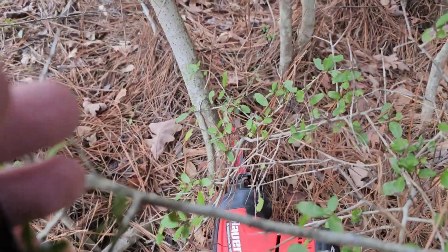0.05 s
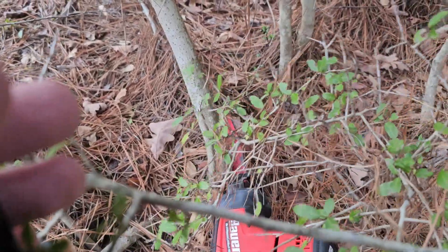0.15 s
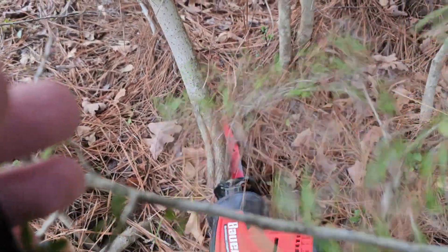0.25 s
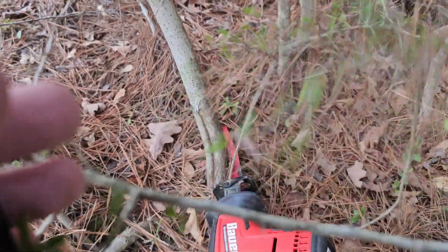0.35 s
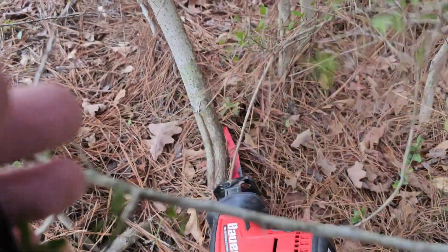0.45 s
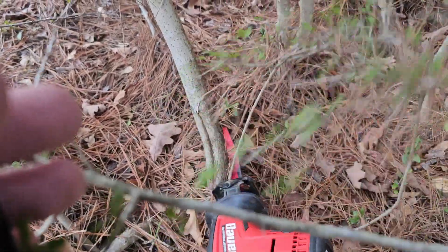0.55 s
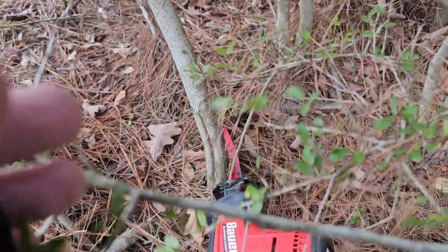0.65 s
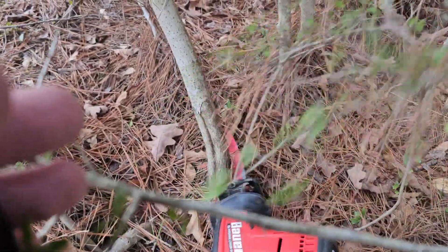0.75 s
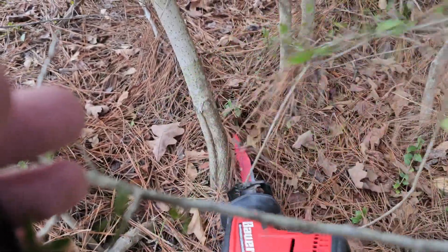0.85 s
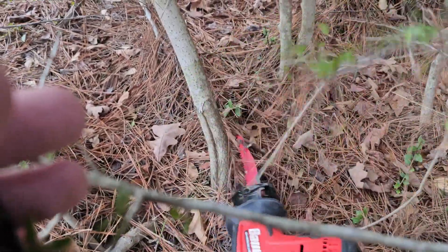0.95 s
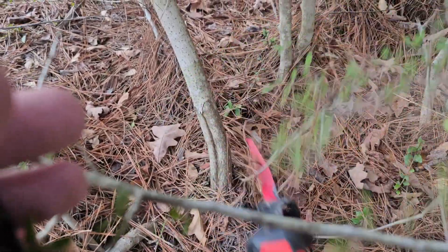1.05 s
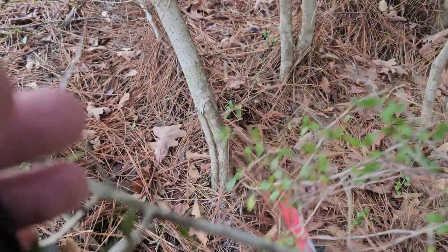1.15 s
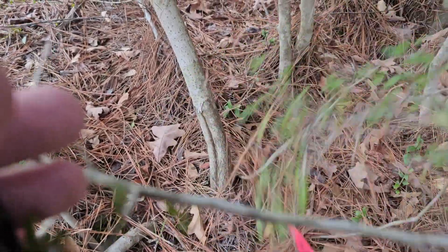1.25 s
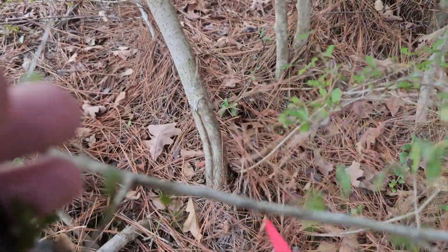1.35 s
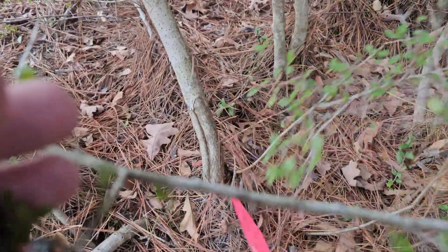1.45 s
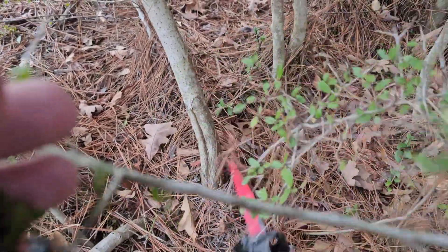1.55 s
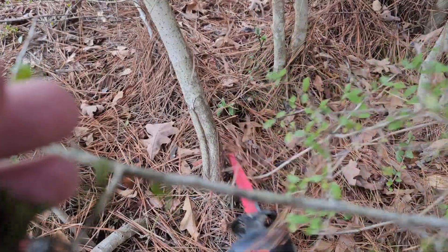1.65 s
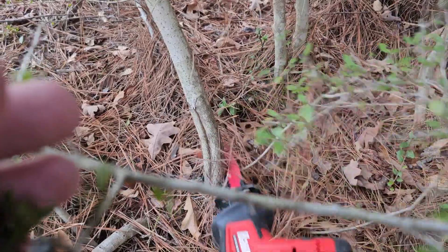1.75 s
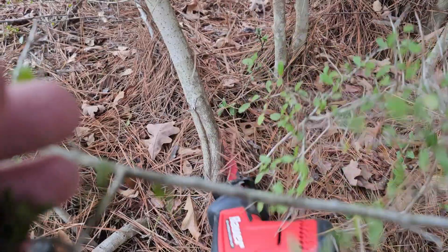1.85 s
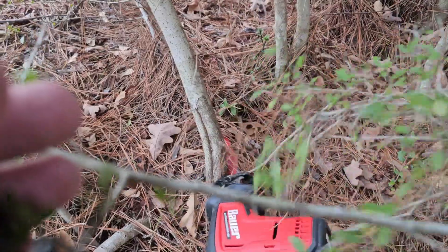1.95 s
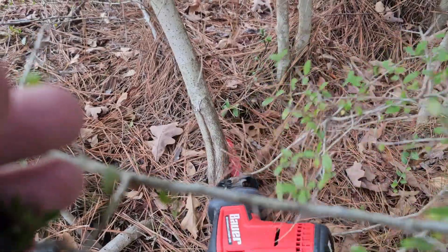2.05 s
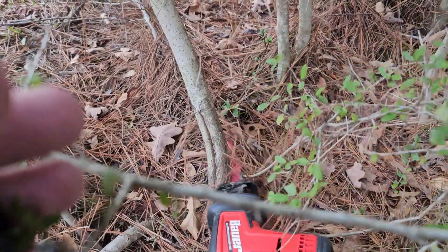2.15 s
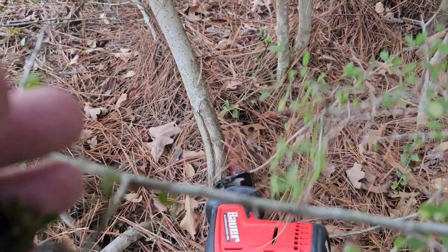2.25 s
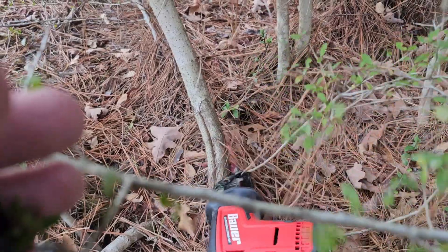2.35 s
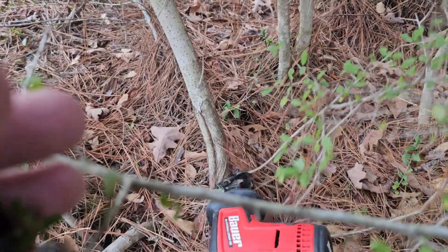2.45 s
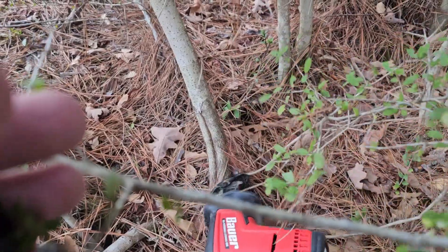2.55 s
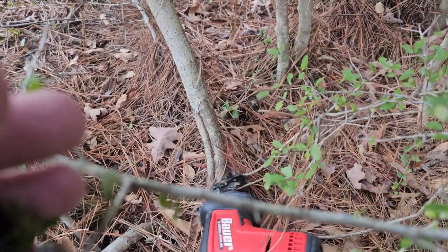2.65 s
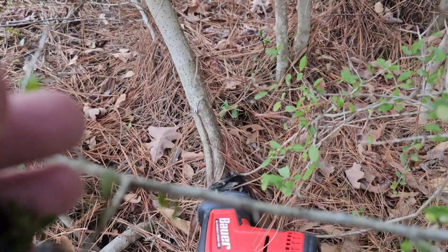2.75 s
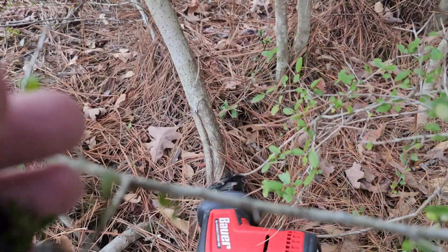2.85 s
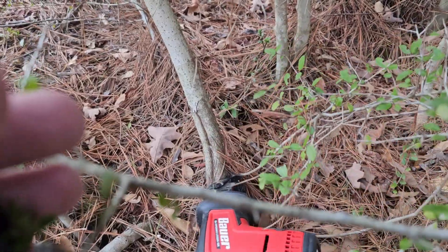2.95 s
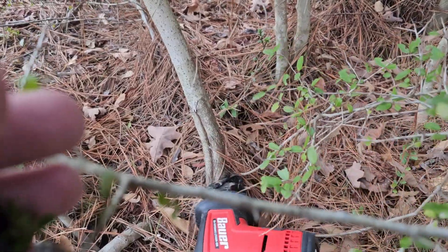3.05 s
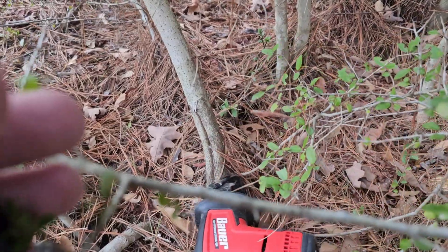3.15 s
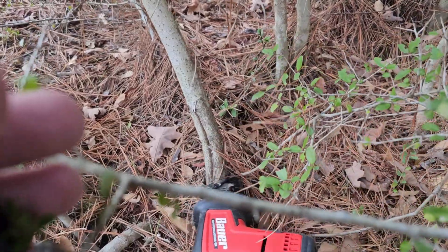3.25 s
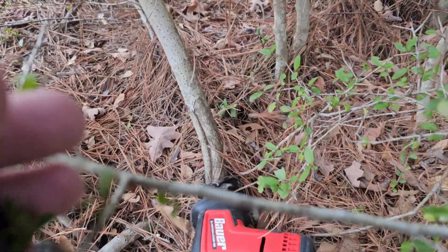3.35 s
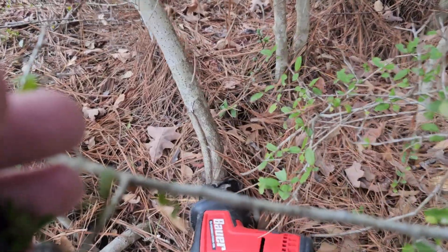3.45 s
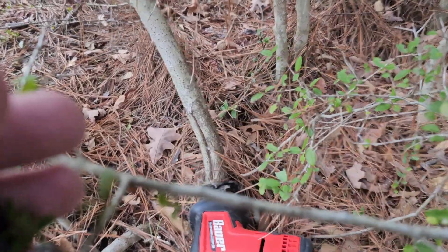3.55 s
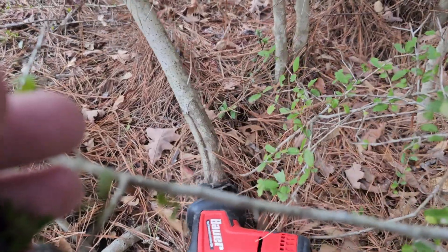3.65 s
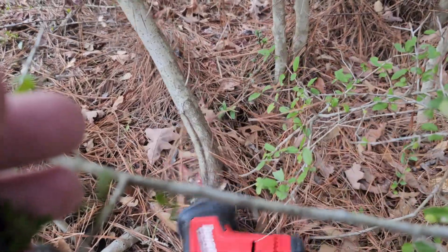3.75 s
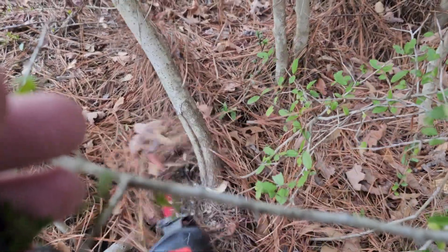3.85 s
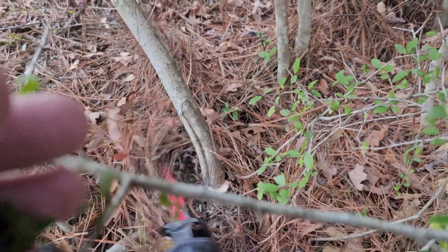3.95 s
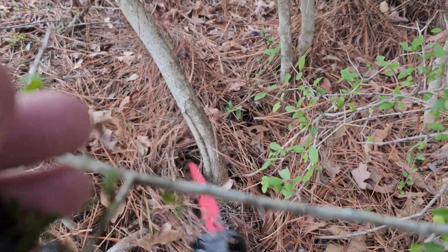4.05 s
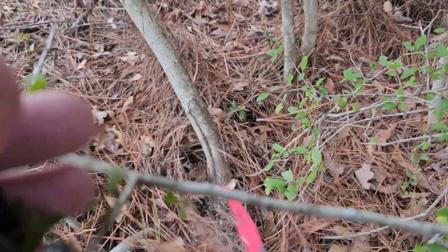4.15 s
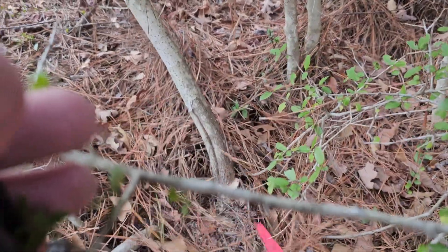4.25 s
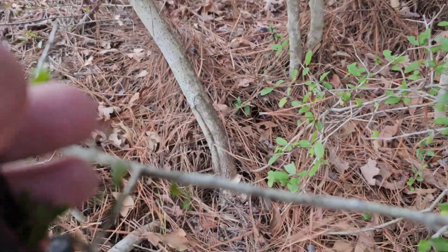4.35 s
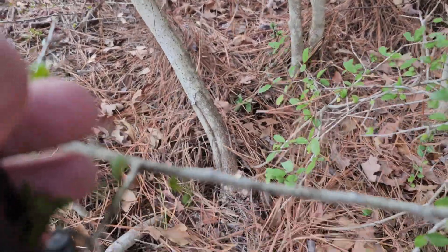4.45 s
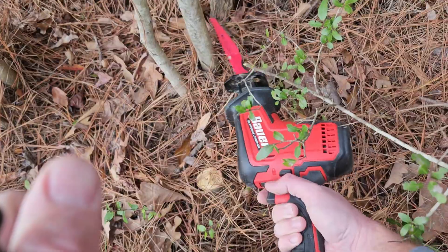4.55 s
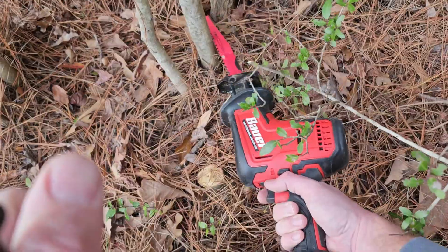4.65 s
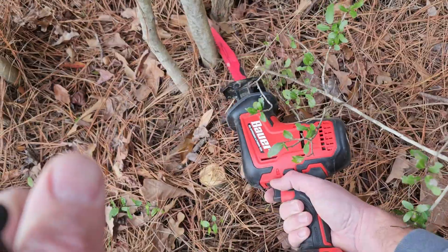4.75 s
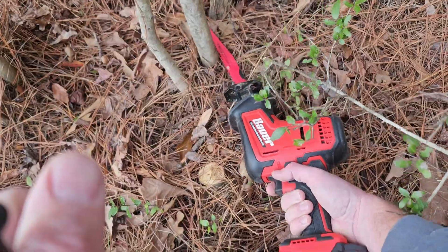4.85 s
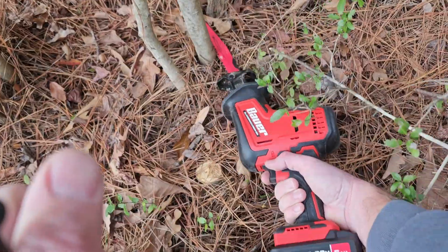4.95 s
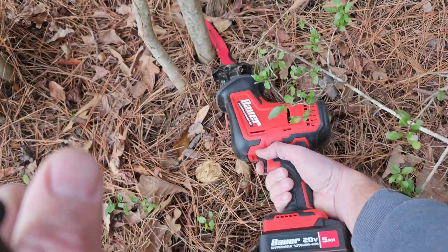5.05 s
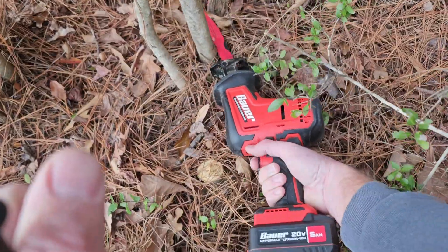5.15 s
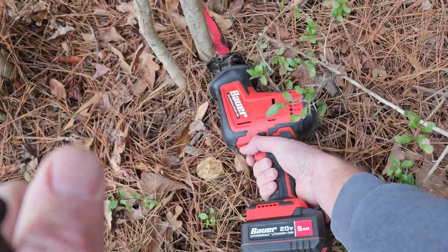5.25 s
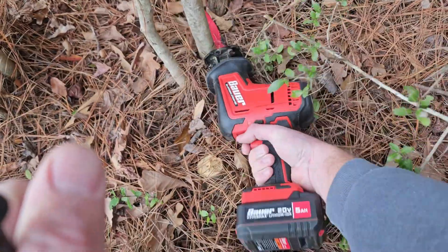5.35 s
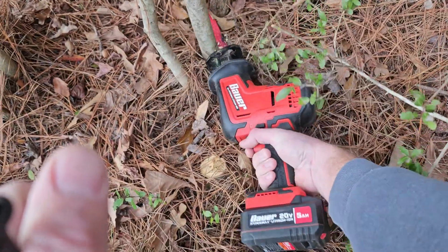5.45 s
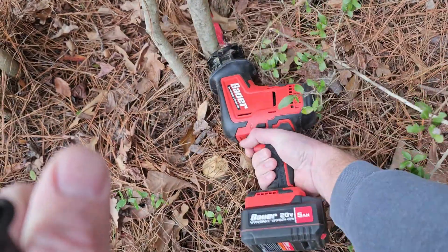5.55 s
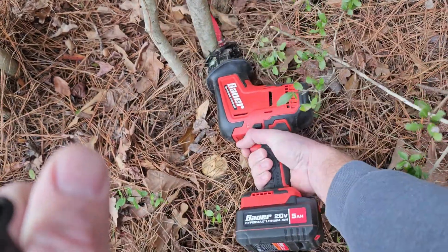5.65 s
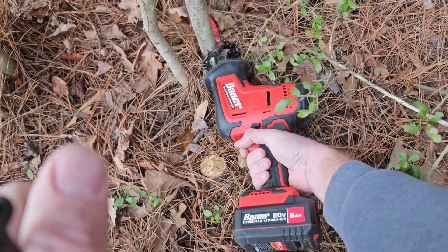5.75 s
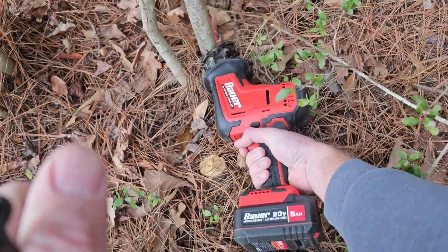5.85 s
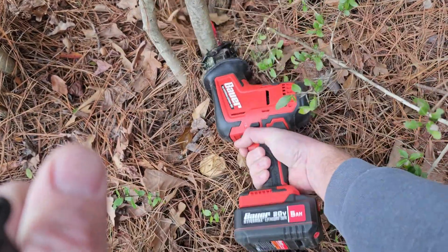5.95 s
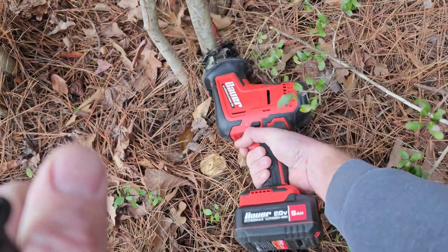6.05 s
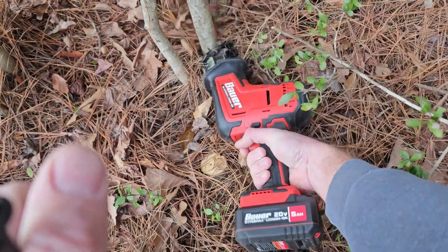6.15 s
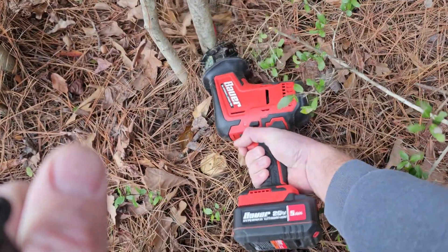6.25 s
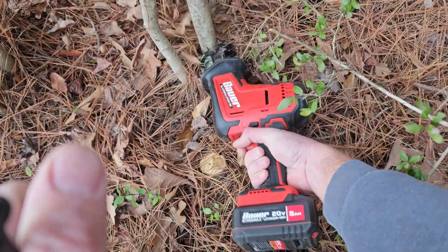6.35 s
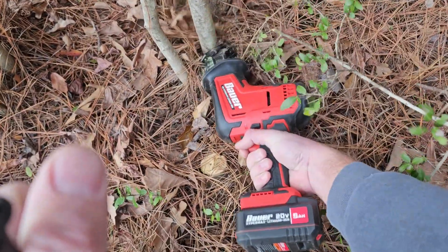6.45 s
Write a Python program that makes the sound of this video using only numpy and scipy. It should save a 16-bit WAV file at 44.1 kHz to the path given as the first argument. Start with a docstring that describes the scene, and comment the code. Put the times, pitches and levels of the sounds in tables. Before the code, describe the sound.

In quiet woodland with a very faint distant engine hum, a twig ticks and a cordless reciprocating saw gives one short clattering blip. Leaves brush and small twigs snap. The saw then starts with a rising gear whine and chatters through a green stem for about two seconds, slows abruptly, and leaves rustle. Sharp twig cracks lead into a second, similar cut that runs to the end. Close stereo microphone, dry open air.

```python
"""Still air and a far engine's low hum, a twig snap, then one short blip of a cordless reciprocating saw close by.
The saw then cuts two saplings; twigs snap and leaves rustle before and between the cuts.
Each stroke knocks the slack drive (filtered impulses and rattle), shakes the tool (harmonics of the stroke rate),
drags teeth through green wood (pulsed noise) and turns whining gears (a tone tied to the motor).
Air, leaves and handling are filtered noise; the engine is a wavering sine."""
import sys
import numpy as np
from scipy import signal
from scipy.fft import rfft, irfft
from scipy.io import wavfile
from scipy.ndimage import uniform_filter1d

SR = 44100
rng = np.random.default_rng(int(sys.argv[2]) if len(sys.argv) > 2 else 0)


def put_to_file(sound):
    """Save the sound as 16-bit audio at rate SR, in the file named by the first command-line argument."""
    columns = np.atleast_2d(sound).T  # one column per channel
    safe = np.clip(columns, -1, 1)
    whole_steps = np.round(safe * 32767)
    wavfile.write(sys.argv[1], SR, whole_steps.astype(np.int16))


N = 286650
T = np.arange(N) / SR  # s
HZ = np.fft.rfftfreq(N, 1 / SR)

# still air: freq_hz, rel_db_per_hz
AIR_SPECTRUM = [(15, -41), (25, -10.5), (84, -3), (190, -18), (416, -15), (560, -18.5), (677, -24),
                (1400, -27), (2690, -35.5), (4370, -31), (6740, -37), (7510, -33), (10700, -42),
                (14800, -36), (16000, -43)]
# far engine: time_s, level_db
ENGINE_LEVEL = [(0, -47), (1.3, -48.5), (1.6, -53.5), (5, -54.5)]
# swells of a far drone: middle_s, length_s, rel_db
DRONE_SWELLS = [(1, 0.29, -57.5), (1.72, 0.43, -50.5)]
DRONE_SPECTRUM = [(280, -10), (420, 2), (560, -11)]  # freq_hz, rel_db_per_hz
# twig snaps: time_s, rel_db
TWIG_SNAPS = [(0.1467, -38.5), (0.842, -31), (1.1766, -38), (1.3585, -24), (1.4135, -29), (1.6375, -37),
              (1.7647, -25), (1.8945, -21), (2.0213, -26.5), (2.072, -28), (4.6992, -31), (4.8443, -18),
              (4.8835, -10.5), (4.9383, -26), (5.031, -23), (5.1355, -20)]
SNAP_SPECTRUM = [(700, -28), (1500, -11.5), (5000, -2.5), (9000, -8.5), (15000, -8)]  # freq_hz, rel_db
# brushes through leaves: start_s, length_s, crisp_rel_db, papery_rel_db
LEAF_BRUSHES = [(0.375, 0.043, -46.5, -58), (.45, 0.54, -62, -65), (0.797, 0.58, -48, -59.5),
                (0.924, 0.32, -53.5, -65), (0.955, 0.11, -46.5, -51), (1.398, 0.76, -54.5, -60),
                (1.623, 0.37, -52, -55.5), (1.715, 0.11, -46, -51.5), (1.857, 0.11, -40, -49.5),
                (4, 0.27, -43, -52), (4.17, 0.02, -35.5, -57), (4.262, 0.5, -51.5, -59),
                (4.83, .385, -36, -43.5), (5.207, 0.021, -25, -34)]
# crisp leaf sound: freq_hz, rel_db_per_hz
CRISP_SPECTRUM = [(1180, -24), (2000, -13), (2640, -8.5), (4610, 3.5), (6760, -2), (7510, 0), (8780, -2.5),
                  (14900, -2.5), (16000, -3)]
# papery leaf sound: freq_hz, rel_db_per_hz
PAPERY_SPECTRUM = [(240, -14.5), (400, -3.5), (533, -7), (629, -5), (947, -5.5), (1350, -0.5), (2620, -5.5),
                   (3200, 0), (4160, -20.5), (7040, -120)]
# stereo tilt of the leaves: freq_hz, left_minus_right_db
LEAF_TILT = [(300, 6.5), (2000, 1.5), (6000, 2.5), (14000, .5)]
# motor twitches before it starts: time_s, rel_db
MOTOR_TWITCHES = [(0.2334, -24), (2.118, -23.5)]
# resonances of the motor can: freq_hz, width_hz, rel_db
CAN_RINGS = [(1240, 250, -13), (1920, 130, -14), (3600, 140, -6), (5000, 170, -33)]
# single knocks of tool and blade: time_s, bright_clack_rel_db, dull_thud_rel_db
SINGLE_KNOCKS = [(.278, -20, -37), (0.29, -12.5, -23), (.319, -8.5, -9), (0.341, -7, -10), (0.368, -13, -8),
                 (0.397, -34, -40), (0.779, -21.5, -46), (1.795, -33, -26), (1.817, -25.5, -33),
                 (2.106, -33.5, -40), (2.137, -25, -38), (2.151, -12, -34.5), (2.19, -14, -33),
                 (4.006, -11, -15), (4.035, -15, -26), (4.472, -53, -29), (4.697, -30.5, -25),
                 (4.762, -40, -30), (4.8, -35, -30), (4.816, -29.5, -34), (4.865, -27, -38)]
CLACK_SPECTRUM = [(300, -23), (600, -2), (1000, -6.0), (1400, -3.0), (1950, -4.0),
                  (2500, -17), (5000, -16), (12000, -43)]  # freq_hz, rel_db
THUD_SPECTRUM = [(110, -29), (220, -6.5), (330, -8.5), (450, 4), (620, -3.5), (850, -7)]  # freq_hz, rel_db
# low buffeting of shaken stems and handling: middle_s, length_s, level_db
BUFFET_SWELLS = [(1.85, 0.24, -51), (2.3, 0.17, -45), (2.7, 0.63, -36.5), (3.54, 0.24, -35),
                 (3.73, 0.11, -26), (4.7, 0.047, -46), (4.82, .08, -42), (5.22, 0.15, -45),
                 (5.38, 0.23, -26.5), (6.35, .5, -35.5)]
BUFFET_SPECTRUM = [(25, -14), (45, 0.0), (90, -3.0), (130, -12), (200, -8), (300, -6)]  # freq_hz, rel_db_per_hz
# trigger pull, blip: pressed_s, released_s, plunger_turn_s, wait_before_full_speed_s
BLIP_PULL = (.265, .368, .343, .5)
# trigger pull, first cut: pressed_s, released_s, plunger_turn_s, wait_before_full_speed_s
FIRST_PULL = (2.15, 4.003, 2.3056, .5)
# trigger pull, second cut: pressed_s, released_s, plunger_turn_s, wait_before_full_speed_s
SECOND_PULL = (5.212, 6.6, 5.3694, .475)
# knocks of the drive in one stroke: place_turns, thud_rel_db, clack_rel_db, scatter_turns
STROKE_KNOCKS = [(-.11, -4, -12, .007), (-.005, -5, 0, .003), (.04, -3, -14, .007), (.13, -7, -7.5, .012),
                 (.41, -.5, -10, .007), (.53, -5, -6.5, .016), (.8, -13, -8, .01)]
# resonances of the housing: freq_hz, width_hz, rel_db
HOUSING_RINGS = [(1361, 7.7, 4), (1920, 150, -11)]
# tool and sapling together, first cut: freq_hz, rel_db_per_hz
FIRST_BODY_SPECTRUM = [(120, -37), (200, -5.5), (221, -16.5), (254, -1), (376, -12), (438, -1), (478, -4.5),
                       (551, 1.5), (870, -1.5), (1000, -7.5), (1300, 2.5), (1710, -1.5), (1880, 3.5),
                       (2400, -12.5), (2700, -11.5), (3510, -80), (5940, -120)]
# tool and sapling together, second cut: freq_hz, rel_db_per_hz
SECOND_BODY_SPECTRUM = [(71, -18), (120, -10), (150, -6.5), (189, -3), (227, 0.5), (311, -0.5), (378, -6.5),
                        (653, 3.5), (1100, -4), (1350, -2.5), (1560, 1.5), (1710, -2.5), (1920, 2),
                        (2430, -10), (2700, -15), (3510, -26), (5940, -120)]
# blade in the wood, first cut: freq_hz, rel_db_per_hz
FIRST_BLADE_SPECTRUM = [(1290, -11.5), (2200, -2), (2470, -17), (2710, -3.5), (3740, -8), (4570, -2),
                        (5170, -4), (5910, -9.5), (6920, -11), (9720, -12), (10700, -16), (12800, -9.5),
                        (15000, -15.5), (16000, -11)]
# blade in the wood, second cut: freq_hz, rel_db_per_hz
SECOND_BLADE_SPECTRUM = [(1290, -31), (2200, -3), (2510, -9.5), (3120, -2), (3900, -10), (4490, -4.5),
                         (6310, -13), (7030, -10.5), (8300, -13), (11500, -13.5), (13900, -13),
                         (14800, -14), (15500, -11), (16000, -14)]
# shaking of the tool, first cut: multiple_of_stroke_rate, rel_db
FIRST_SHAKE = [(1, 0.5), (2, -10), (3, -3.5), (4, 1), (5, -3.5), (6, -12), (7, -1), (8, -59), (9, 1),
               (10, -24), (11, 4), (12, 2), (13, -11), (14, 3)]
# shaking of the tool, second cut: multiple_of_stroke_rate, rel_db
SECOND_SHAKE = [(1, 0.5), (2, -7), (3, -7.5), (4, 0.5), (5, -17), (6, -7), (7, -5), (8, -39), (9, -4),
                (10, 0.5), (11, -9), (12, -3), (13, -5), (14, -3)]
# blade binding in the cut: middle_s, length_s, extra_bite_0_to_1, share_lost_every_other_stroke_0_to_1
BLADE_BINDS = [(2.4, 0.058, 0.46, 0), (2.52, .06, .3, 0.16), (2.713, 0.056, 0.54, 0),
               (3.38, 0.21, 0.7, 0.3), (3.71, 0.2, 1, .45)]
# likeness of the two microphone ports: freq_hz, likeness_0_to_1
PORT_LIKENESS = [(130, .95), (290, .96), (640, .96), (1400, .83), (3100, .45), (6000, .12)]
# stereo tilt of the saw, first cut: freq_hz, left_minus_right_db
FIRST_TILT = [(60, 1.5), (110, 3.3), (200, 0.43), (380, 1.3), (700, 1.9), (1290, 4), (2380, 3.7),
              (4400, 3.4), (8120, 0.48), (15000, 2.2)]
# stereo tilt of the saw, second cut: freq_hz, left_minus_right_db
SECOND_TILT = [(60, 1.5), (110, 4), (200, -0.5), (380, 1.5), (700, 0), (1290, 3.5), (2380, 1.5),
               (4400, 2.5), (8120, -0.5), (15000, -1)]

AIR_DB = -55.5
ENGINE_FLUTTER = .2  # unsteadiness of the engine level, rms share
RUSTLE_ATTACK_S, RUSTLE_RELEASE_S = 0.033, 0.037
# soft start, step to full stroke rate, brake on release
SOFT_HZ, FULL_HZ, SPIN_UP_S, GOVERNOR_HZ, STEP_S, BRAKE_S = 45.15, 49.75, .074, 1.48, .1, .062
# first stem parts: the freed motor surges until the governor catches it
THROUGH_S, SURGE_HZ, FREE_S = 3.785, 2.2, .048
HUNT_TURNS = .002  # the governor hunts: strokes come slightly early or late
TAKE_UP_S = 0.046  # the drive knocks fully only once its slack is taken up
COAST_S = 0.047  # decay of the sound under the brake
# exponents: loudness against stroke rate
CLATTER_POWER, RASP_POWER, SHAKE_POWER = 0.39, 0.99, 3
LOOSE = .7  # rattle of loose parts, relative to the knock
WHINE_ROUGH = .3  # flutter of the gear whine, rms share
EDGE_HZ = 15750


def amp(db):
    """Decibels to gain."""
    return 10 ** (np.asarray(db) / 20)


def evened(x):
    """Scales to an rms of 1."""
    return x / np.sqrt(np.mean(x ** 2) + 1e-20)


def unit(x, where=slice(None)):
    """Scales a pair so that its centre has an rms of 1."""
    return x / np.sqrt(np.mean(x.mean(0)[where] ** 2) + 1e-20)


def read(points, hz):
    """Reads a spectrum table on a log-frequency axis."""
    freq_hz, value = np.transpose(points)
    return np.interp(np.log(hz + 1), np.log(freq_hz + 1), value)


def noise():
    """Two white noises."""
    return rng.standard_normal((2, N))


def wander(hz):
    """Slow random signal of rms 1, up to about hz."""
    return evened(irfft(rfft(rng.standard_normal(N)) / (1 + (HZ / hz) ** 4), N))


def clicks(times_s, sizes):
    """Train of single impulses."""
    index = np.round(np.asarray(times_s) * SR).astype(int)
    return np.bincount(np.clip(index, 0, N - 1), sizes, N)


def fading(x, seconds):
    """Every impulse dies away with this time constant."""
    return signal.lfilter([1], [1, -np.exp(-1 / (seconds * SR))], x)


def bursts(rows, seconds):
    """Short puffs of contact noise, one a row."""
    time_s, rel_db = np.transpose(rows)
    return noise() * fading(clicks(time_s, amp(rel_db)), seconds)


def grains(per_s, spread_db):
    """Sparse crackle of widely varied size."""
    struck = rng.random((2, N)) < per_s / SR
    size = amp(spread_db * rng.exponential(1, (2, N)).clip(0, 4))
    return evened(noise() * struck * size)


def colour(x, points):
    """Causal minimum-phase filter with the given spectrum, falling steeply beyond its ends."""
    hz = abs(np.fft.fftfreq(4096, 1 / SR)) + 1
    octaves_out = np.maximum(np.log2(points[0][0] / hz), np.log2(hz / points[-1][0])).clip(0)
    log_gain = np.log(amp(np.maximum(read(points, hz) - 30 * octaves_out, -90)))
    taps = np.fft.ifft(np.exp(np.conj(signal.hilbert(log_gain)))).real
    return signal.oaconvolve(x, taps[None], axes=1)[:, :N]


def ring(x, hz, width_hz):
    """Resonance with a peak gain of 1."""
    return signal.lfilter(*signal.iirpeak(hz, hz / width_hz, SR), x)


def ports(x, side=None, lag_ms=0.087):
    """Two signals become the port pair: shared bass, separate treble, the right a little late."""
    left, other = rfft(x)
    same = read(PORT_LIKENESS, HZ).clip(0, 1)
    right = same * left + np.sqrt(1 - same ** 2) * other
    right = right * np.exp(-2j * np.pi * HZ * lag_ms / 1000)
    tilt = amp(read(side, HZ) / 2) if side else 1
    return irfft(np.array([left * tilt, right / tilt]), N)


def swell(middle_s, length_s):
    """Rounded hump of height 1; length_s is its width at half height."""
    return np.exp2(-np.minimum(abs(2 * (T - middle_s) / length_s), 4) ** 3)


def swells(rows):
    """Gain of several humps together."""
    return sum(amp(db) * swell(middle_s, length_s) for middle_s, length_s, db in rows)


def outdoors(hum_hz=73, drone_db=-3):
    """Still air as noise, a far engine as a wavering sine, and a faint noise-band drone that comes and goes."""
    air = amp(AIR_DB) * unit(ports(colour(noise(), AIR_SPECTRUM)))
    level = amp(np.interp(T, *np.transpose(ENGINE_LEVEL))) * (1 + ENGINE_FLUTTER * wander(16))
    phase = 2 * np.pi * (hum_hz * T + 0.068 * wander(11)) - np.array([[0], [.3]])
    hum = np.sqrt(2) * level * np.sin(phase) * amp([[1], [-1]])
    drone = unit(ports(colour(noise(), DRONE_SPECTRUM)))
    return air + hum + amp(drone_db) * swells(DRONE_SWELLS) * drone


def brush(start_s, length_s):
    """Envelope of one rustle: quick attack, hold, slower release."""
    t = T - start_s
    release = np.exp(-(t - length_s).clip(0, 1) / RUSTLE_RELEASE_S)
    return (t / RUSTLE_ATTACK_S).clip(0, 1) * release


def undergrowth(crisp_db=-0.5, papery_db=-1, snap_db=3, clump_db=1.1, tick_db=-3):
    """Snapping twigs are noise bursts; leaves and pine needles crackle in clumps, with sparse sharper ticks."""
    snaps = colour(bursts(TWIG_SNAPS, seconds=.0021), SNAP_SPECTRUM)
    clumps = evened(amp(clump_db * wander(47)))
    needles = noise() + grains(per_s=2500, spread_db=4)
    ticks = evened(noise() * fading(grains(per_s=320, spread_db=2.5)[0], seconds=.0006))
    crisp = unit(ports(colour(needles * clumps + amp(tick_db) * ticks, CRISP_SPECTRUM), LEAF_TILT))
    dry_leaves = noise() + grains(per_s=1500, spread_db=3.5)
    papery = unit(ports(colour(dry_leaves * clumps, PAPERY_SPECTRUM), LEAF_TILT))
    power = sum((amp([[high], [low]]) * brush(start_s, length_s)) ** 2
                for start_s, length_s, high, low in LEAF_BRUSHES)
    crisp_level, papery_level = np.sqrt(power)
    leaves = amp(crisp_db) * crisp_level * crisp + amp(papery_db) * papery_level * papery
    return leaves + amp(snap_db) * snaps


def handling(clack_db=7, thud_db=7, twitch_db=23, buffet_db=0):
    """Motor twitches ring the can; knocks of the tool are filtered bursts; buffeting is swelling low noise."""
    jerk = bursts(MOTOR_TWITCHES, seconds=0.0018)
    twitches = sum(amp(db) * ring(jerk, hz, width_hz) for hz, width_hz, db in CAN_RINGS)
    knocks = np.array(SINGLE_KNOCKS)
    clacks = colour(bursts(knocks[:, [0, 1]], seconds=0.0053), CLACK_SPECTRUM)
    thuds = colour(bursts(knocks[:, [0, 2]], seconds=0.002), THUD_SPECTRUM)
    contact = ports(amp(clack_db) * clacks + amp(thud_db) * thuds, FIRST_TILT)
    buffet = unit(ports(colour(noise(), BUFFET_SPECTRUM)))
    return contact + amp(twitch_db) * twitches + amp(buffet_db) * swells(BUFFET_SWELLS) * buffet


def stroke_rate(pressed_s, released_s, wait_s, freed):
    """Strokes a second: soft start with slight overshoot, step to full speed, surge when freed, brake."""
    t = (T - pressed_s).clip(0)
    soft = SOFT_HZ * (1 - np.exp(-t / SPIN_UP_S) * np.cos(2 * np.pi * GOVERNOR_HZ * t))
    step = (FULL_HZ - SOFT_HZ) * ((t - wait_s) / STEP_S).clip(0, 1)
    surge = SURGE_HZ * freed * np.exp(1 - freed)
    brake = (1 - (T - released_s) / BRAKE_S).clip(0, 1)
    return (soft + step + surge) * brake


def dodging(turns):
    """Share of the bite left in each stroke: a springy stem dodges every other one."""
    lost = sum(share * swell(middle_s, length_s) for middle_s, length_s, _, share in BLADE_BINDS)
    return 1 - lost.clip(0, 1) * (np.floor(turns + 1.25) % 2)


def clatter(turns, running, body, side, bed, vary_db=1.3, split_hz=1050, rattle_s=.0018):
    """Slack drive knocks at set places in each stroke; loose parts rattle after it, over a bed of gear noise."""
    place, thud_db, clack_db, scatter = np.transpose(STROKE_KNOCKS)
    strokes = np.arange(np.floor(turns[0]), turns[-1] + 1)[:, None]
    at = strokes + place + scatter * rng.standard_normal((len(strokes), len(place)))
    heard = (at > turns[0]) & (at < turns[-1])
    times_s = np.interp(at[heard], turns[running], T[running])
    drive = 0
    for knock_db, band in ((thud_db, "low"), (clack_db, "high")):
        sizes = amp(knock_db + vary_db * rng.standard_normal(at.shape))[heard]
        blows = clicks(times_s, sizes)
        blows = blows / np.sqrt(np.mean(blows[running] ** 2))
        shake = fading(blows ** 2, rattle_s)
        rattle = noise() * np.sqrt(LOOSE ** 2 * shake / shake[running].mean() + bed ** 2)
        # the far port also hears a bounce off the ground, 1.1 ms late
        blows = np.array([blows, np.roll(blows, round(.0011 * SR))])
        split = signal.butter(3, split_hz, band, fs=SR, output="sos")
        drive = drive + signal.sosfilt(split, blows + rattle)
    drive = drive + sum(amp(db) * ring(drive, hz, width_hz) for hz, width_hz, db in HOUSING_RINGS)
    return unit(ports(colour(drive, body), side), running)


def whine(turns, speed, ring_db, steady_db, strain_db, mesh=107., ring_hz=3720, width_hz=380):
    """Gear whine climbs with the motor and flares as it sweeps up through a ring of the motor can."""
    driving = uniform_filter1d(1. * (np.gradient(speed) > 0), size=300)
    resonance = 1 / (1 + ((mesh * speed - ring_hz) / width_hz) ** 2) ** 2
    flare = amp(steady_db) * speed / FULL_HZ + driving * amp(ring_db) * resonance
    loaded = np.clip((speed - 37) / 4, 0, 1)
    # the load varies within a stroke
    wobble = loaded * (.15 * np.sin(2 * np.pi * turns) + .12 * wander(110))
    angle = mesh * turns + wobble + .05 * wander(300)
    tone = np.cos(2 * np.pi * angle + np.array([[0], [-1.2]]))
    gears = np.sqrt(2) * flare * (1 + WHINE_ROUGH * wander(250)) * tone
    # the can sings under starting torque
    torque = driving * (1 - (speed / SOFT_HZ) ** 2).clip(0, 1) ** 2
    strain = amp(strain_db) * evened(ring(noise(), ring_hz, width_hz)) * torque
    return (gears + strain) * amp([[2], [-1]])


def rasp(turns, running, blade, side, grip, pull_at=0.2, pull_width=.14, bite_gain=3.04):
    """Teeth tear through the wood on the pull stroke; the main knock makes the blade chink."""
    from_pull = (turns - pull_at + .022 * wander(40) + .5) % 1 - .5
    pull = dodging(turns) * np.exp(.35 * wander(250)) / (1 + (from_pull / pull_width) ** 2) ** 2
    force = 1 + bite_gain * grip.clip(0, 1) * pull
    force /= np.sqrt(uniform_filter1d(force ** 2, size=4000))
    teeth = noise() + 0.33 * grains(per_s=3700, spread_db=5.5)
    chink = 2.6 * ring(noise() * np.exp(-(turns % 1) / .045) * running, 3500, 4000)
    return unit(ports(colour(teeth * force + chink, blade), side), running)


def shaking(turns, orders, upper_db, waver=0.25, port_lag=0.18):
    """Swinging plunger shakes the tool at multiples of the stroke rate; the right port gets the lowest late."""
    lowest = amp(orders[0][1])
    hum = lowest * np.cos(2 * np.pi * (turns + .19) - port_lag * np.array([[0], [1]]))  # port_lag in radians
    upper = 0
    for multiple, db in orders[1:]:
        tone = np.cos(2 * np.pi * (round(multiple) * turns + rng.random()))
        upper = upper + amp(db + upper_db) * (1 + waver * wander(14)) * tone
    return np.sqrt(2) * (hum + upper) / lowest * amp([[.9], [-.9]])


def saw(pull, body, blade, side, orders, clatter_db, rasp_db, shake_db, upper_db, ring_db, whine_db,
        strain_db, bed, bite, through_s=np.inf):
    """One trigger pull: everything follows the stroke of the plunger and grows with its speed."""
    pressed_s, released_s, turn_s, wait_s = pull
    freed = (T - through_s).clip(0) / FREE_S
    speed = stroke_rate(pressed_s, released_s, wait_s, freed)
    running, pace = speed > 0, speed / FULL_HZ
    turns = np.cumsum(speed) / SR
    turns += HUNT_TURNS * wander(7) - np.interp(turn_s, T, turns)
    binding = sum(extra * swell(middle_s, length_s) for middle_s, length_s, extra, _ in BLADE_BINDS)
    grip = (bite + binding) * np.exp(-freed)
    # a stroke that bites knocks harder
    load = uniform_filter1d(.55 + .45 * dodging(turns), size=150)
    load /= uniform_filter1d(load, size=3600)
    engaged = ((T - pressed_s) / TAKE_UP_S).clip(0, 1) ** 2
    drive = amp(clatter_db) * engaged * load * clatter(turns, running, body, side, bed)
    drive += whine(turns, speed, ring_db, whine_db, strain_db)
    cutting = amp(rasp_db) * rasp(turns, running, blade, side, grip)
    shake = amp(shake_db) * shaking(turns, orders, upper_db)
    coasting = np.exp(-(T - released_s).clip(0) / COAST_S)
    return coasting * (pace ** CLATTER_POWER * drive + pace ** RASP_POWER * cutting + pace ** SHAKE_POWER * shake)


def scene():
    """The blip and the two cuts among the small sounds of the wood."""
    blip = saw(BLIP_PULL, SECOND_BODY_SPECTRUM, FIRST_BLADE_SPECTRUM, FIRST_TILT, FIRST_SHAKE,
               clatter_db=-28, rasp_db=-29, shake_db=-45, upper_db=-12, ring_db=-46, whine_db=-56,
               strain_db=-24.5, bed=0.7, bite=0.45)
    first = saw(FIRST_PULL, FIRST_BODY_SPECTRUM, FIRST_BLADE_SPECTRUM, FIRST_TILT, FIRST_SHAKE,
                clatter_db=-18.0, rasp_db=-24.5, shake_db=-33.5, upper_db=-2.5, ring_db=-17, whine_db=-36,
                strain_db=-29, bed=0.87, bite=0.21, through_s=THROUGH_S)
    second = saw(SECOND_PULL, SECOND_BODY_SPECTRUM, SECOND_BLADE_SPECTRUM, SECOND_TILT, SECOND_SHAKE,
                 clatter_db=-19.5, rasp_db=-22.0, shake_db=-34, upper_db=-1, ring_db=-20, whine_db=-43,
                 strain_db=-25.5, bed=0.73, bite=0.16)
    return outdoors() + undergrowth() + handling() + blip + first + second


def record(dry):
    """Rounds off the highest peaks, then low-passes at EDGE_HZ."""
    excess = np.maximum(abs(dry) - .6, 0)
    rounded = dry - np.sign(dry) * (excess - .35 * np.tanh(excess / .35))
    lowpass = signal.firwin(401, EDGE_HZ, window=("kaiser", 9), fs=SR)
    return signal.oaconvolve(rounded, lowpass[None], "same")


dry = scene()
out = record(dry)
put_to_file(out)
```